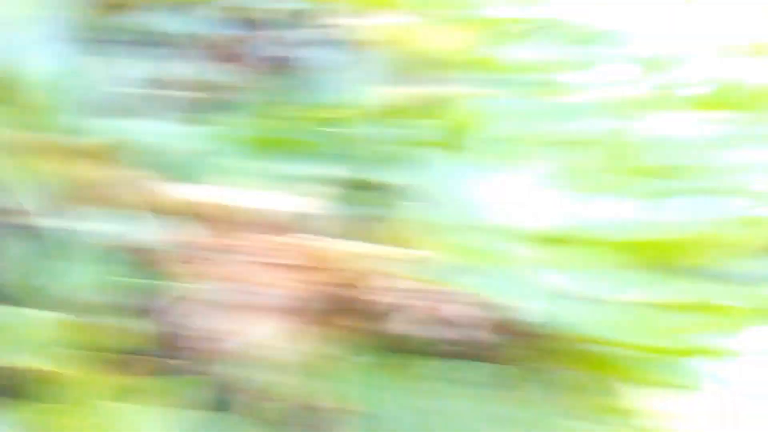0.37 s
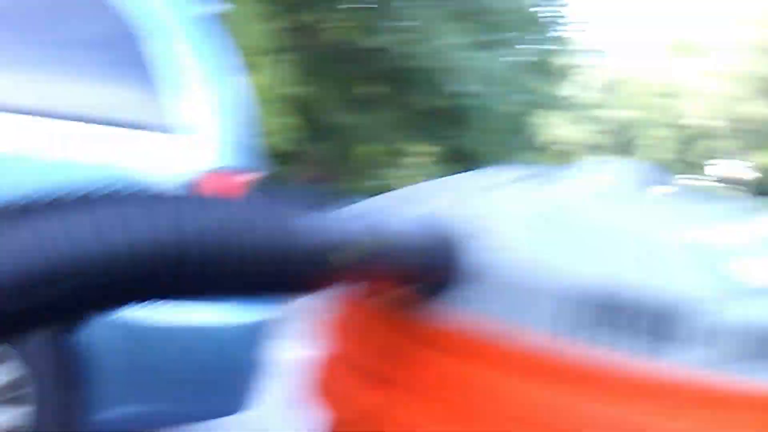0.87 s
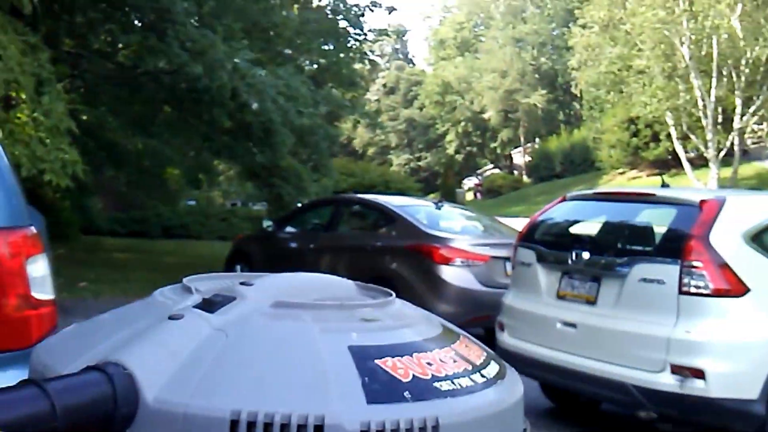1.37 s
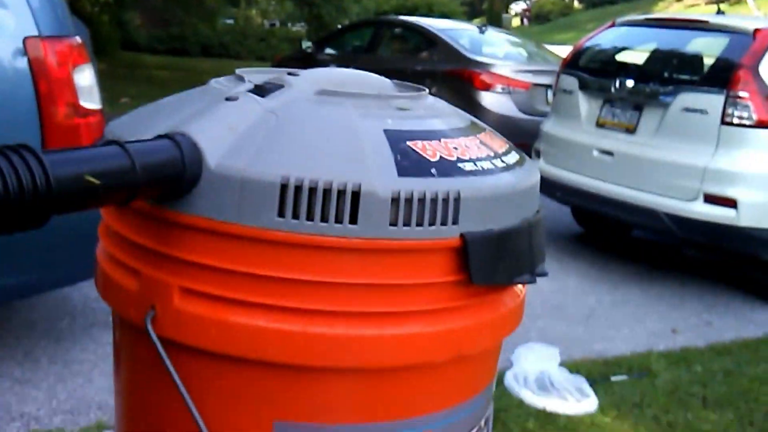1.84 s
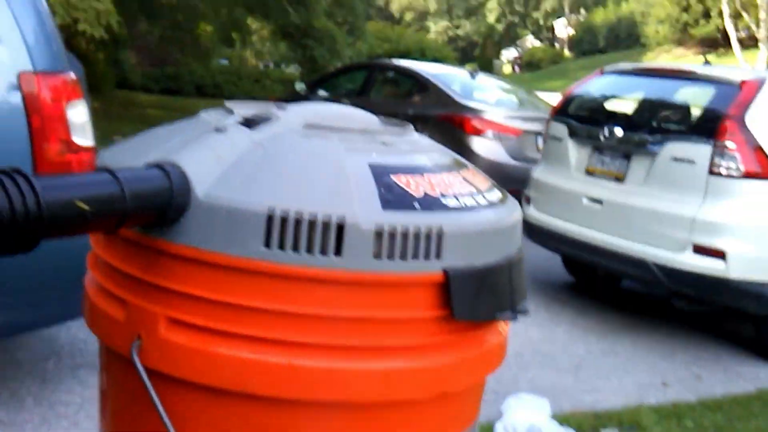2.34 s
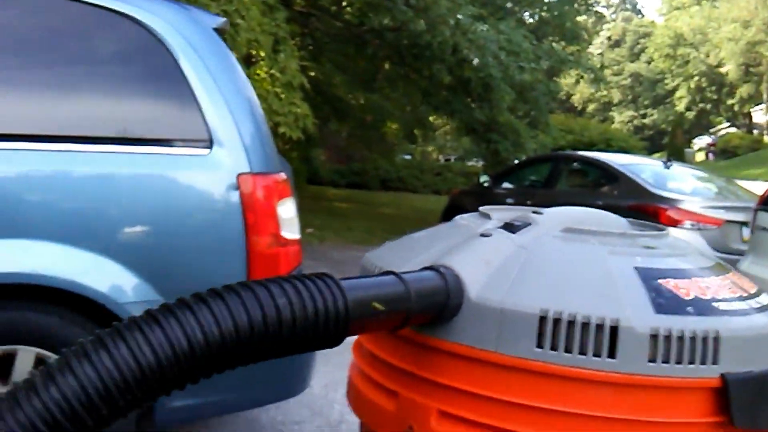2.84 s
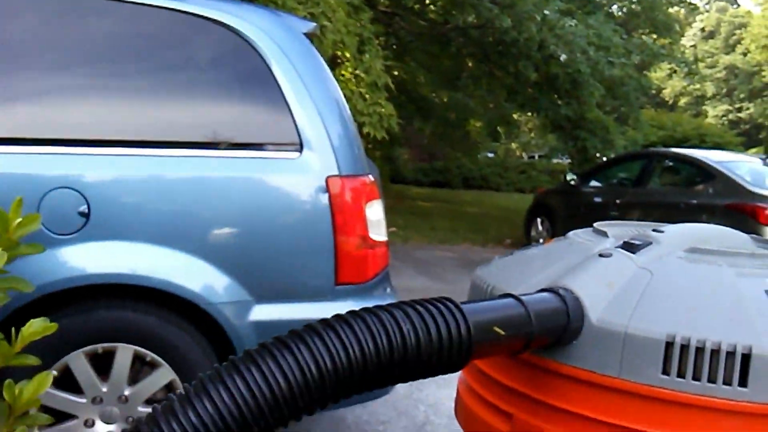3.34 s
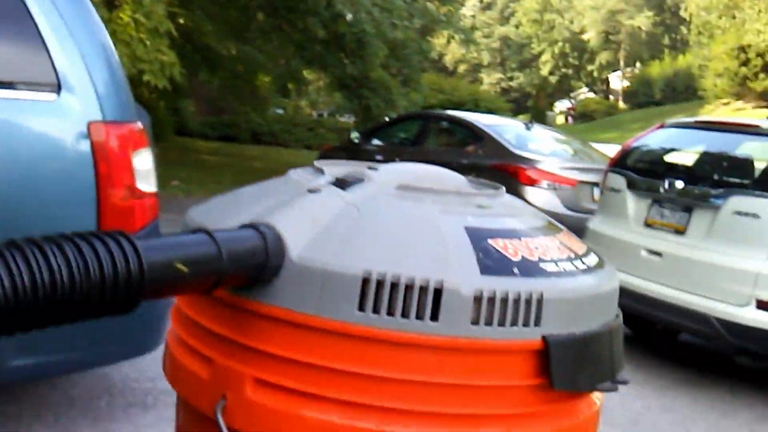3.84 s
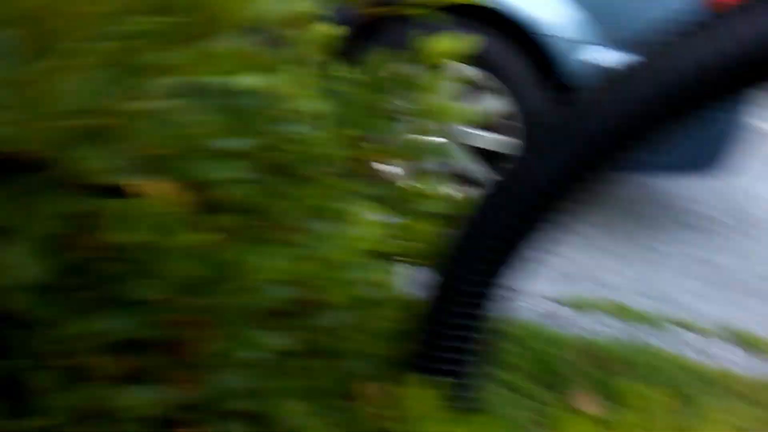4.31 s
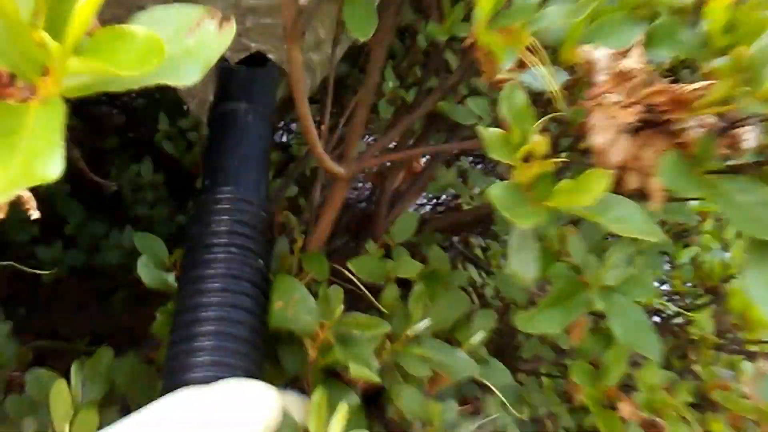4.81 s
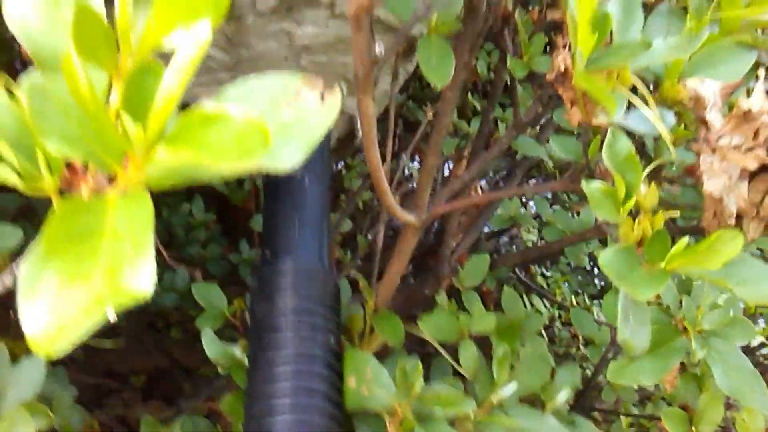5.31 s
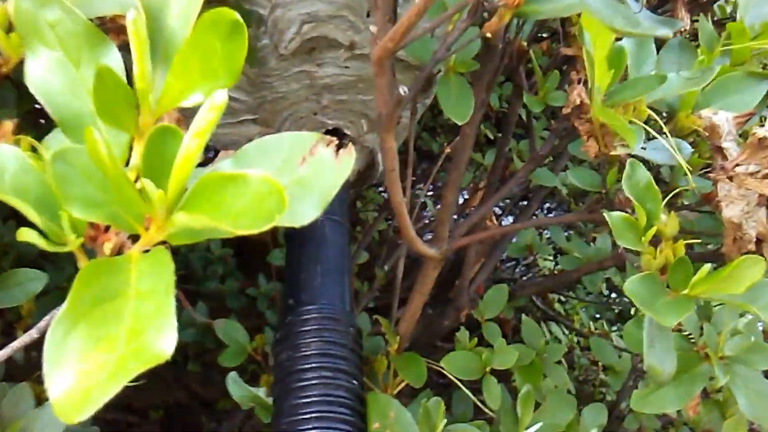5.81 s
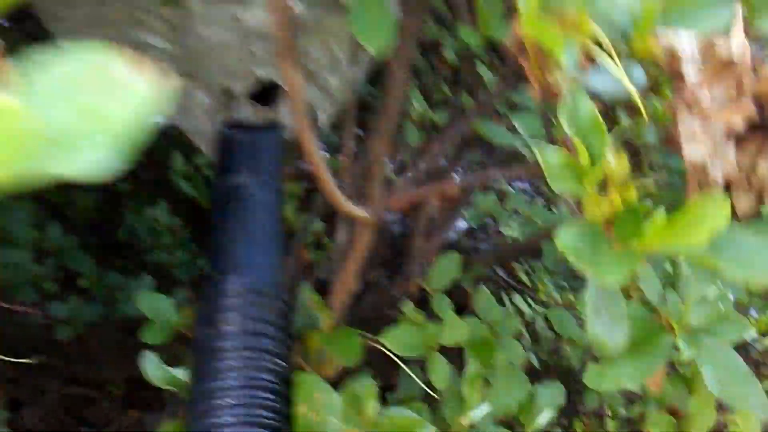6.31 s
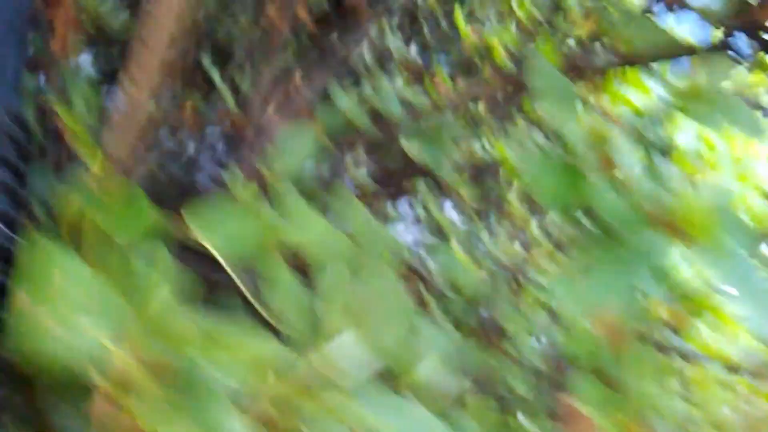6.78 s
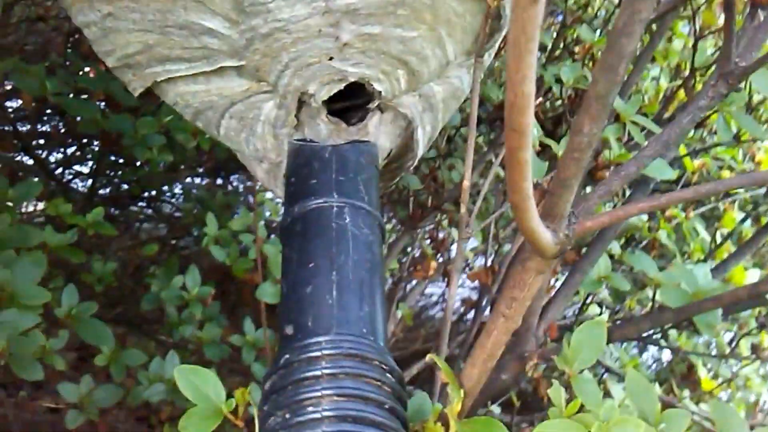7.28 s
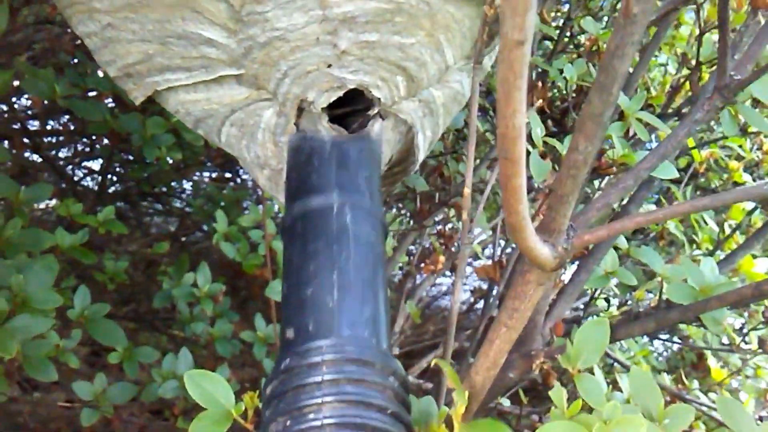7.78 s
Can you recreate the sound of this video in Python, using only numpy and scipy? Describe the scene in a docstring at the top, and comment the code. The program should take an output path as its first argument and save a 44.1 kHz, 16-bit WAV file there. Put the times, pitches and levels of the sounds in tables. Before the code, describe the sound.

A bucket vacuum runs continuously for nearly eight seconds outdoors, heard closely through a small, limited camera microphone. A steady motor hum near 263 Hz, a strong fan whine around 1.6 kHz and a fainter one near 3.2 kHz sit over coarse rushing air. At 0 s the sound is at the nozzle in a shrub, with little top hiss; a small hiss flare comes at 0.2 s. By 0.6-1 s the motor head faces us: fuller vent roar, bright jet hiss. Around 1.4 s the roar swells and drops within a fraction of a second. The hiss shifts gently until 4 s. From 4.2 to 4.7 s it swings back: hiss sinks, whine weakens, and a close echo makes the roar boxy until about 6.5 s. Dry twig ticks fall near 4.75 and 6.7 s; short hiss flares near 4.75, 5.6, 5.7, 6.3 and 6.7 s. It is still running at the end.

```python
"""Outdoors, one small camera microphone close to a running bucket vacuum, beginning at the hose nozzle in a shrub.
Shaft tones hum and whine over coloured air noise; by 1 s we face the motor head, where vents and jet hiss are louder.
The roar surges briefly near 1.4 s. From 4 s we swing back to the nozzle: the jets sink, a close echo colours the
roar, twigs snap (noise bursts) and the hiss flares as leaves part. Throughout, the noise has a deep gap at
4.4-5.1 kHz and a limiter holds the peaks."""
import sys
import numpy as np
from scipy import signal
from scipy.fft import rfft, irfft, next_fast_len
from scipy.io import wavfile
from scipy.ndimage import uniform_filter1d, minimum_filter1d, map_coordinates

SR = 44100
rng = np.random.default_rng(int(sys.argv[2]) if len(sys.argv) > 2 else 0)


def amplitude_ratio(level_db):
    """Convert a level in decibels to the matching linear amplitude (field) ratio."""
    exponent = np.asarray(level_db, float) / 20
    return 10 ** exponent


def dump(signal):
    """Clip the signal to [-1, 1] and save it as 16-bit WAV at the path in sys.argv[1]."""
    limited = np.clip(np.atleast_2d(signal).T, -1, 1)
    pcm = np.round(limited * 32767).astype(np.int16)
    wavfile.write(sys.argv[1], SR, pcm)


N = 348390  # samples
MAINS_HZ = 60
JET_MEAN_DB = -38  # reference level of the jet hiss


def unit(x):
    """Scaled to rms 1."""
    return x / np.sqrt(np.mean(x ** 2) + 1e-20)


def along(points, hz):
    """(f/Hz, value) points read on a log frequency axis."""
    f, v = np.transpose(points)
    return np.interp(np.log(hz + 1), np.log(f + 1), v)


def curves(rows):
    """One value per sample for each column after the time."""
    s, *cols = np.transpose(rows)
    return [np.interp(np.arange(N) / SR, s, c) for c in cols]


def wobble(rate):
    """A smooth random curve with rate knots a second."""
    knots = rng.standard_normal(int(N * rate / SR) + 4)
    return map_coordinates(knots, [np.arange(N) * rate / SR], order=1)


def coloured(x, spectrum):
    """x through a (f/Hz, level/dB) spectrum."""
    m = next_fast_len(N + 8192)
    gain = amplitude_ratio(along(spectrum, np.fft.rfftfreq(m, 1 / SR)))
    return irfft(rfft(x, m) * gain, m)[..., :N]


def turbulence(patchy_db):
    """Moving air as white noise of rms 1, with patches of random gain in time and frequency."""
    z = signal.stft(rng.standard_normal(N), nperseg=512)[2]
    field = uniform_filter1d(rng.standard_normal(z.shape), size=6, axis=0)
    field = uniform_filter1d(field, size=12, axis=1)
    return unit(signal.istft(z * amplitude_ratio(patchy_db * unit(field)), nperseg=512)[1][:N])


def burst(s, rise_s, fall_db_per_s):
    """Gain that rises to 1 at s and then fades."""
    t = np.arange(N) / SR - s
    return np.where(t < 0, np.clip(1 + t / rise_s, 0, 1), amplitude_ratio(-fall_db_per_s * np.abs(t)))


# the camera's swing: t/s, turn to the motor head (about 0-1), closeness to the nozzle mouth (0-1)
SWING = [(0, 0, 1), (.3, 0.06, 1), (.55, 0.53, .2), (.75, 0.77, 0.36), (.95, 1, .3), (1.3, 1.05, 0.45),
         (1.7, 0.97, 0.3), (2.3, 0.92, .2), (3.3, 0.96, 0.22), (3.9, 0.97, 0.12), (4.16, 0.8, .1),
         (4.3, .7, 0.43), (4.47, .2, 0), (4.75, 0.14, 0.13), (5.6, 0.07, 0.02), (6.2, 0.04, 0.2),
         (6.6, 0, .55), (7.0, 0, 0.8), (7.4, 0.1, 0.68), (7.9, 0, 1)]


def camera():
    """Turn to the head, closeness to the nozzle, and how far side-on we stand (most at half a turn)."""
    head, nozzle = curves(SWING)
    return head, nozzle, np.sin(np.pi * head) ** 2


# microphone port against the outlet jets:
# t/s, relative hiss level/dB, shading level/dB at 13 kHz, shading level/dB at the very top
PORT_AIM = [(0, -52.5, -5, -15), (.3, -47, -7, -13), (.47, -42, -6, -15), (.64, -33, -5, -14),
            (.77, -31, -10, -22), (.85, -33.5, -16, -19), (1.0, -36.5, -10, -7), (1.25, -42.5, 1, -7),
            (1.47, -42.5, 4.5, -5), (1.68, -40.5, -3.5, -10), (1.78, -38.5, -11, -18), (1.9, -39, -14, -25),
            (2.3, -41, -16, -20), (2.55, -38, -7.5, -16), (3.28, -33.5, -12, -18), (3.54, -34.5, -12, -16),
            (3.65, -37, -6, -15), (3.92, -44, -6, -9), (4.08, -37, -13, -18), (4.22, -34, -17, -19),
            (4.36, -37, -8, -8), (4.52, -45.5, 1, -9), (4.72, -60.5, 6, -3), (5.1, -62, -2, -11),
            (6.1, -57, -4, -17), (6.9, -57, -8, -12), (7.25, -57.5, -2, 0), (7.6, -55.5, 0, -4),
            (7.9, -53, -5, -2)]


def port_aim():
    """Steady jet level and the two shadings as the port turns."""
    return curves(PORT_AIM)


# the hiss flares as leaves part: t/s, relative peak level/dB, fade/(dB per s)
LEAF_FLARES = [(.21, -45, 80), (4.75, -50, 49), (5.56, -54, 79), (5.72, -50.5, 111), (5.9, -63, 81),
               (6.27, -50.5, 13.5), (6.73, -53, 62)]


def jet_level():
    """Jet hiss with its flares added as power, and its shading, in dB."""
    steady_db, shade_db, top_db = port_aim()
    power = amplitude_ratio(steady_db) ** 2
    for s, db, fade in LEAF_FLARES:
        power = power + (amplitude_ratio(db) * burst(s, rise_s=0.03, fall_db_per_s=fade)) ** 2
    return 10 * np.log10(power), shade_db, top_db


# shaft speed: t/s, turns per second
SHAFT_SPEED = [(0.3, 263.31), (1.1, 263.14), (1.9, 263.41), (2.7, 263.6), (3.9, 263.68), (4.3, 263.56),
               (5.1, 263.57), (5.9, 263.19), (6.3, 263.1), (7.5, 263.09)]


def shaft_angle():
    """The shaft's angle in radians, its speed summed over time."""
    return 2 * np.pi * np.cumsum(curves(SHAFT_SPEED)[0]) / SR


# fan tones as echoes add or cancel them: t/s, blade tone level/dB, twice-blade tone level/dB
FAN_TONES = [(0, -28, -26), (.17, -24, -32.5), (.35, -35.5, -31), (.57, -23, -29), (.82, -19, -29),
             (1.34, -24.5, -31), (1.63, -25.5, -23.5), (1.95, -20.5, -27), (2.44, -22, -25.5),
             (2.9, -21.5, -30), (3.4, -25, -30), (3.62, -22.5, -34), (3.94, -24.5, -26), (4.25, -23.5, -31),
             (4.45, -24, -21), (4.62, -35, -29), (4.75, -33, -28.5), (4.9, -33, -25), (5.05, -31, -26),
             (5.25, -34, -28.5), (5.54, -37, -24), (6.16, -35, -26.5), (6.47, -27.5, -36.5),
             (6.55, -30, -38), (6.65, -24.5, -33), (6.82, -29, -29), (7.17, -31.5, -39.5), (7.45, -30, -36),
             (7.9, -31, -38)]


def fan_levels():
    """Six blades pass per turn, giving orders 6 and 12."""
    blade_count = 6
    blade_db, twice_db = curves(FAN_TONES)
    return {blade_count: blade_db + 0.52 * wobble(14), 2 * blade_count: twice_db + 1.35 * wobble(15)}


# unbalance hum and housing orders: order, level/dB turned away, gains/dB at the head, side-on, at the nozzle
HOUSING_ORDERS = [(1, -19.5, -0.5, 2.3, 0), (11, -54.5, 25.5, .1, 6), (21, -69, -17, 14, -13)]
# random waver of those orders, one per row above: level/dB
HOUSING_WAVER = (0.2, 3, -1.5)


def housing_levels():
    """The unbalanced shaft shakes the housing; levels follow the camera."""
    head, nozzle, side_on = camera()
    levels = {}
    for (k, db, near, side, mouth), waver in zip(HOUSING_ORDERS, HOUSING_WAVER):
        levels[round(k)] = db + near * head + side * side_on + mouth * nozzle + waver * wobble(3.85)
    return levels


# orders carried by the jets: order, level/dB at reference hiss, dB per dB of hiss, share of the 13 kHz shading
OUTLET_ORDERS = [(24, -52.5, 2, 0), (35, -46, 0.8, .5), (41, -44.5, 2.5, 1.1), (48, -52, 1.6, 1.6)]


def outlet_levels():
    """Orders that ride the jets, following their hiss and weaker when we face away."""
    away_db = -3.5 * (1 - camera()[0])
    jet_db, shade_db, _ = jet_level()
    levels = {}
    for k, db, grows, share in OUTLET_ORDERS:
        aimed_db = grows * (jet_db - JET_MEAN_DB) + share * shade_db
        levels[round(k)] = db + aimed_db + away_db + 2.2 * wobble(4.1)
    return levels


def strong_tones(turn, strong_db):
    """Sines locked to the shaft's turn, with two mains-linked tones."""
    mains = 2 * np.pi * MAINS_HZ * np.arange(N) / SR
    tones = sum(np.sqrt(2) * amplitude_ratio(db) * np.sin(k * turn + k * k) for k, db in strong_db.items())
    # the magnetic pull pulses at twice the mains and beats with the shaft
    tones += amplitude_ratio(-37) * np.sin(turn + 2 * mains)
    return tones + amplitude_ratio(-61.5) * np.sin(mains)


# weaker orders with levels of their own, some fainter than their neighbours:
# order, level/dB over the air noise in 1 Hz, before waver and common trim
OWN_LEVEL_ORDERS = [(2, 13.5), (3, 12.5), (5, 4), (8, 10), (14, 13.5), (15, 8), (19, 7), (20, 11), (22, 24),
                    (23, 20.5), (30, 18), (32, 6), (33, 22.5), (34, 18), (36, 19.5), (39, 21), (40, 18),
                    (42, 21.5), (44, 9), (45, 19.5), (54, 18), (58, 9)]


def faint_comb(turn, strong_db):
    """The remaining shaft orders, scaled against white air noise of rms 1 and weaker when we face away."""
    over_db = {k: 20.3 * (k > 18) for k in range(2, 60) if k not in strong_db} | dict(OWN_LEVEL_ORDERS)
    comb = 0
    for k, db in over_db.items():
        # each order swells and fades at random
        comb = comb + amplitude_ratio(db + 3.3 * wobble(2.526)) * np.sin(k * turn + rng.uniform(0, 2 * np.pi))
    trim_db = -0.7 - 0.5 * (1 - camera()[0])
    return amplitude_ratio(trim_db) * comb * 2 / np.sqrt(SR)


# the roar swells and drops back: t/s, level/dB
ROAR_SURGES = [(1.445, 9.5)]


def surge():
    """Swell of the roar in dB, exponential up and down."""
    t = np.arange(N) / SR
    rise_s, fall_s = 0.032, 0.015  # time constants
    return sum(db * np.exp(-np.abs(t - s) / np.where(t < s, rise_s, fall_s)) for s, db in ROAR_SURGES)


# a close echo of the roar while the camera dips into the shrub: t/s, strength (0-1)
SHRUB_ECHO = [(0, 0), (4.3, 0), (4.7, .5), (6.3, .5), (6.8, 0), (7.9, 0)]


def shrub_echo(air):
    """The roar again off a near surface; a small surface returns short waves best."""
    delay_s = 0.00192
    late = np.roll(air, round(delay_s * SR))
    return curves(SHRUB_ECHO)[0] * coloured(late, [(700, -54), (2300, -5.0), (3000, -6.0), (3800, -15)])


# air noise colours of the five places: f/Hz, relative level/dB
HOUSING_AIR = [(20, -51), (45, -33), (60, -21.5), (120, -26), (150, -14.5), (200, -5), (330, 0.5),
               (520, -4), (700, -4.5), (1300, 2), (1900, -8), (4500, -9.5), (5300, -31), (6500, -100)]
BUCKET_AIR = [(300, -100), (450, -18.5), (600, -7.5), (780, -3.5), (940, -0.5), (1050, -3.5), (1120, -12),
              (1500, -26.5), (2500, -100)]
VENT_AIR = [(600, -100), (1000, -33), (1300, -10), (1700, -5.5), (2200, -0.5), (2500, -3), (2800, -14),
            (4000, -100)]
UPPER_VENT_AIR = [(1400, -100), (2100, -46), (2450, 0.5), (2900, 2), (3200, 2.5), (3400, -3.5),
                  (3800, -54.5), (5000, -100)]
NOZZLE_AIR = [(500, -100), (900, -34), (1300, -5), (1700, -8), (3100, -16), (3500, -3), (4000, -6.5),
              (4500, -3), (5300, -28.5), (6500, -100)]
# the same places in order, before the pickup colour: level/dB turned away, gain/dB at the head,
# gain/dB at the nozzle, dB lost per dB of jet hiss, share of a surge, gain/dB side-on
ROAR_LAYERS = [(-24.5, 1, 1.56, 0, 0.7, 0.9), (-28, 7.5, 0.5, 0, 0.8, -1.5), (-28.5, 10.5, -4, 0, 0.6, 1.2),
               (-27.5, 8.5, -3.5, 0.37, .6, -4.5), (-28, 2.5, 8, 0, 0.25, 0)]


def roar(comb):
    """Air noise from housing, bucket, vents and nozzle, each coloured and levelled by where the camera points."""
    head, nozzle, side_on = camera()
    aimed_db = np.clip(head, 0, 1) * (port_aim()[0] - JET_MEAN_DB)
    surge_db = surge()
    colours = (HOUSING_AIR, BUCKET_AIR, VENT_AIR, UPPER_VENT_AIR, NOZZLE_AIR)
    air = np.zeros(N)
    for (db, near, mouth, lost, share, side), colour in zip(ROAR_LAYERS, colours):
        level_db = db + near * head + mouth * nozzle + side * side_on
        level_db = level_db - lost * aimed_db + share * surge_db
        air += amplitude_ratio(level_db) * unit(coloured(turbulence(patchy_db=0.6) + comb, colour))
    return air + shrub_echo(air)


# colour of the outlet jets: f/Hz, relative level/dB
JET_AIR = [(3500, -100), (4800, 9.5), (8500, 0.5), (10000, 0.5), (13000, 0.5), (15700, 1.5)]
# corners of the shading, none at the first: f/Hz
SHADE_CORNERS = (7000, 10000, 13000, 15300)


def hiss(comb, turn):
    """Jet noise pulsing with shaft and twice the mains; turning the camera shades its upper part."""
    twice_mains = 4 * np.pi * MAINS_HZ * np.arange(N) / SR
    beat = 1 + 0.12 * np.sin(turn) + 0.062 * np.sin(twice_mains)
    jets = unit(coloured(beat * turbulence(patchy_db=1.5) + comb, JET_AIR))
    hz, t, z = signal.stft(jets, SR, nperseg=256)
    level_db, shade_db, top_db = (np.interp(t * SR, np.arange(N), c) for c in jet_level())
    mid_db = -1.5 + 0.13 * shade_db  # at 10 kHz, partly following 13 kHz
    shading_db = 0
    for corner, db in zip(np.eye(len(SHADE_CORNERS))[1:], (mid_db, shade_db, top_db)):
        shading_db = shading_db + np.outer(np.interp(hz, SHADE_CORNERS, corner), db)
    return signal.istft(z * amplitude_ratio(level_db + 11.0 + shading_db), SR, nperseg=256)[1][:N]


# twig snaps: t/s, starting level/dB before colour, t60/s
TWIG_SNAPS = [(4.741, -38, .04), (4.749, -40, .005), (6.715, -27.5, .005)]


def twigs():
    """Short dry snaps: noise that decays exponentially, coloured bright."""
    snaps, t = np.zeros(N + SR), np.arange(SR // 10) / SR
    for s, db, t60 in TWIG_SNAPS:
        snaps[round(s * SR):][:len(t)] += amplitude_ratio(db - 60 * t / t60) * rng.standard_normal(len(t))
    return coloured(snaps[:N], [(3000, -62), (5000, 5), (9000, 7), (16000, -15)])


def scene():
    """Tones and noise, kept apart until they reach the one microphone."""
    turn = shaft_angle()
    strong_db = fan_levels() | housing_levels() | outlet_levels()
    tones = strong_tones(turn, strong_db)
    comb = faint_comb(turn, strong_db)
    return np.array([tones, roar(comb) + hiss(comb, turn) + twigs()])


# colour of the noise as picked up, with a deep gap at 4.4-5.1 kHz: f/Hz, level/dB
PICKUP_COLOUR = [(4040, 1), (4090, -11.5), (4260, -15), (4330, -31), (4420, -53), (5130, -38),
                 (5200, -19.5), (5400, -20), (6000, -9.5), (7000, -4.5), (7800, 0)]
# the microphone's own noise: f/Hz, relative level/dB in 1 Hz
MIC_NOISE = [(20, -12.5), (50, -17), (150, -29), (4000, -36), (5000, -33.5), (16000, -51)]


def microphone(tones, noise):
    """Colours the noise and adds self-noise; the tones are given as they arrive."""
    own = unit(coloured(rng.standard_normal(N), MIC_NOISE))
    return tones + coloured(noise, PICKUP_COLOUR) + amplitude_ratio(-65.0) * own


def limiter(x, top, hold, release):
    """Gain drops just before a peak, holds and glides back (hold and release in s)."""
    need = np.minimum(1, top / (np.abs(x) + 1e-9))
    hold_n, release_n = round(hold * SR), round(release * SR)
    held = minimum_filter1d(need, hold_n, origin=hold_n // 2 - 90)
    drop = uniform_filter1d(held, size=90)
    glide = uniform_filter1d(held, release_n, origin=release_n // 2 - 1)
    return x * np.minimum(drop, glide)


def roll_off(x):
    """The treble ends steeply here."""
    return signal.sosfilt(signal.butter(12, 15740, fs=SR, output="sos"), x)


def record(dry):
    """One microphone picks up tones and noise, and the limiter holds the peaks."""
    heard = microphone(*dry)
    mix = limiter(heard, top=0.89, hold=0.0087, release=0.043)
    return roll_off(mix)


dry = scene()
out = record(dry)
dump(out)
```